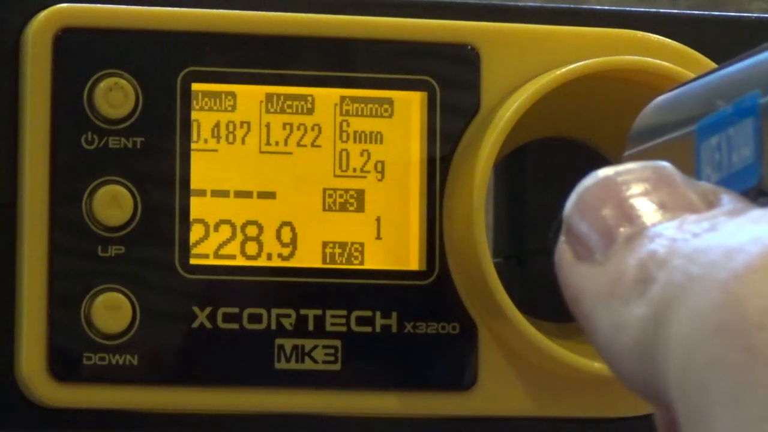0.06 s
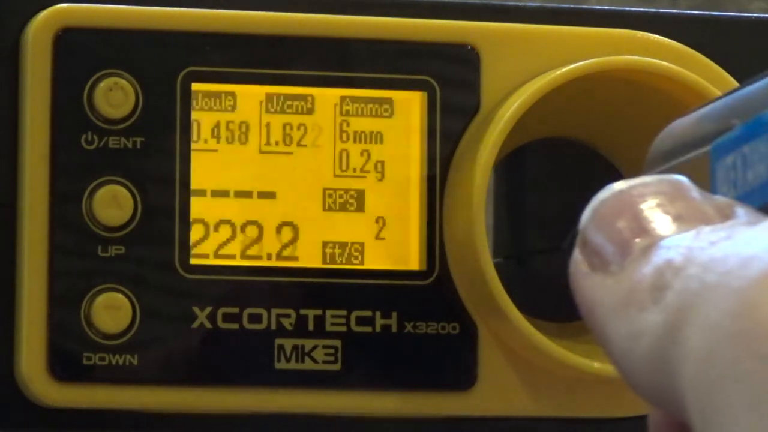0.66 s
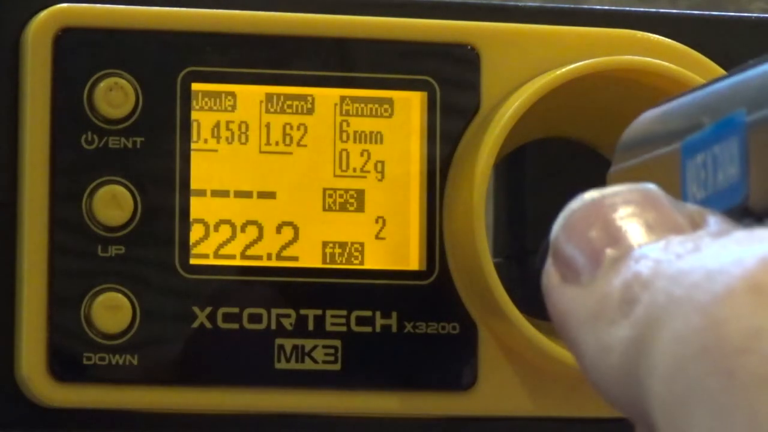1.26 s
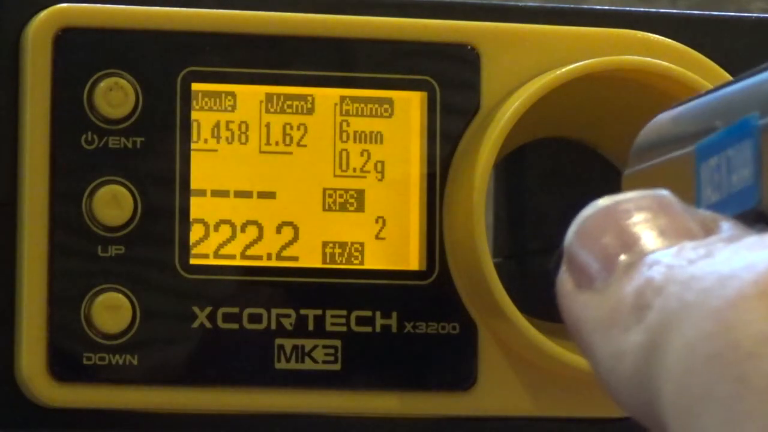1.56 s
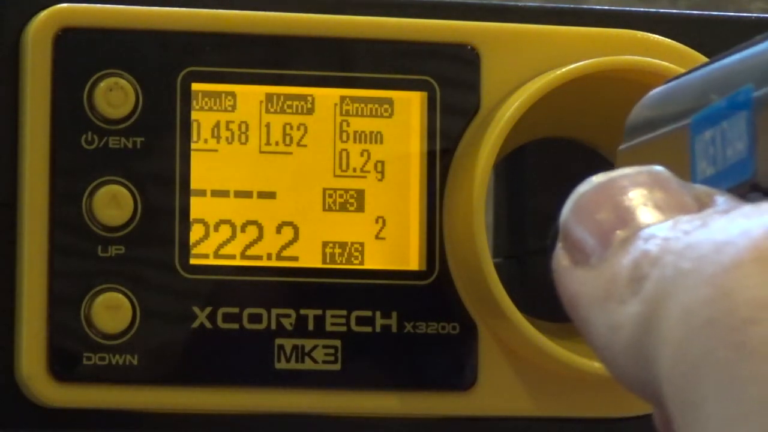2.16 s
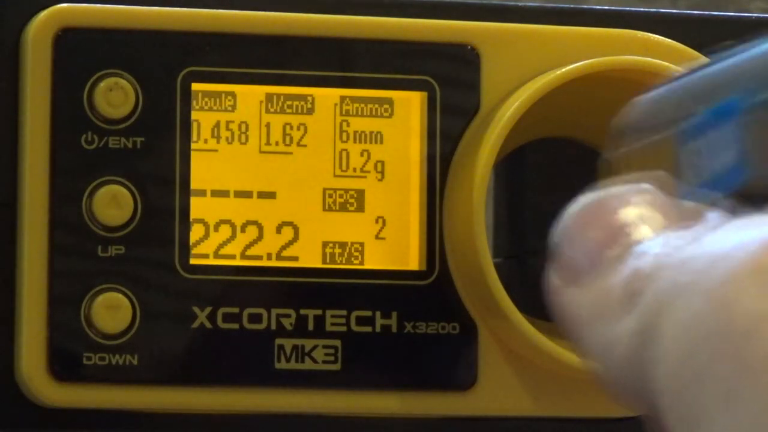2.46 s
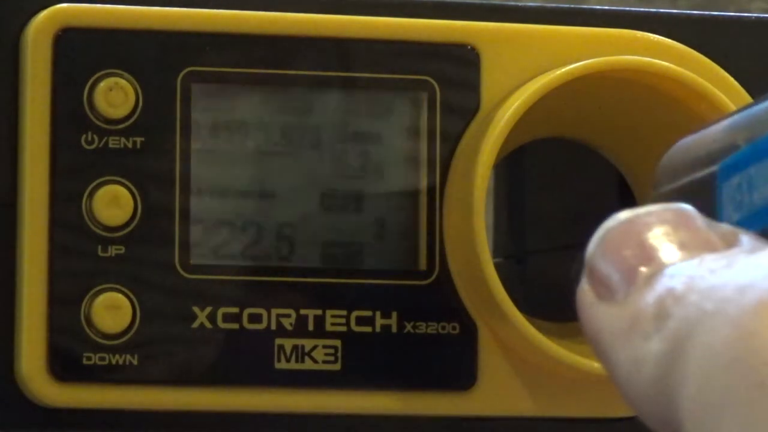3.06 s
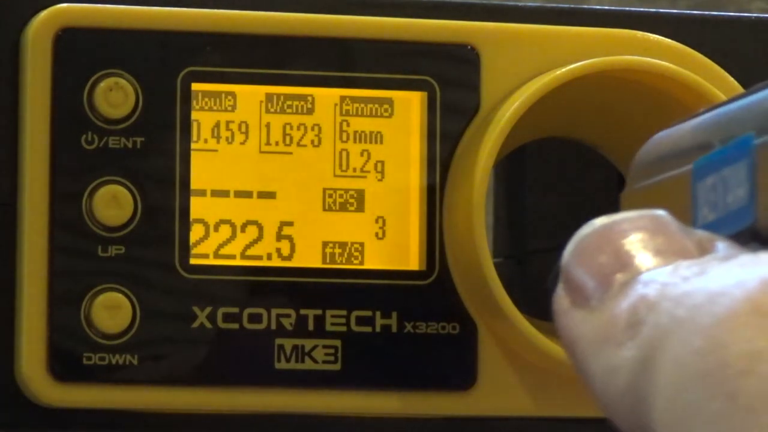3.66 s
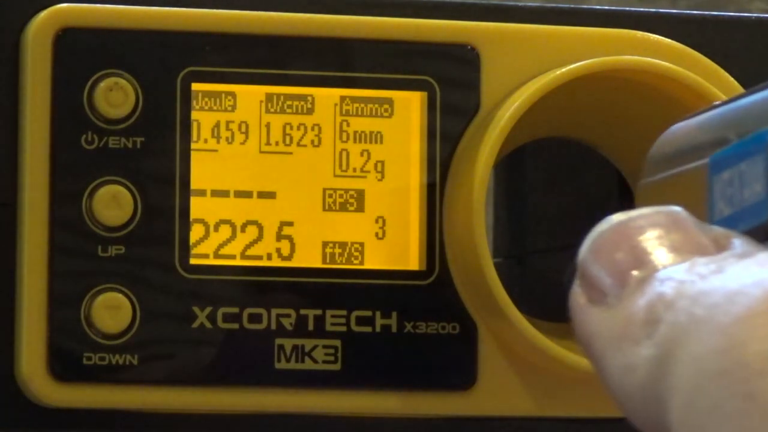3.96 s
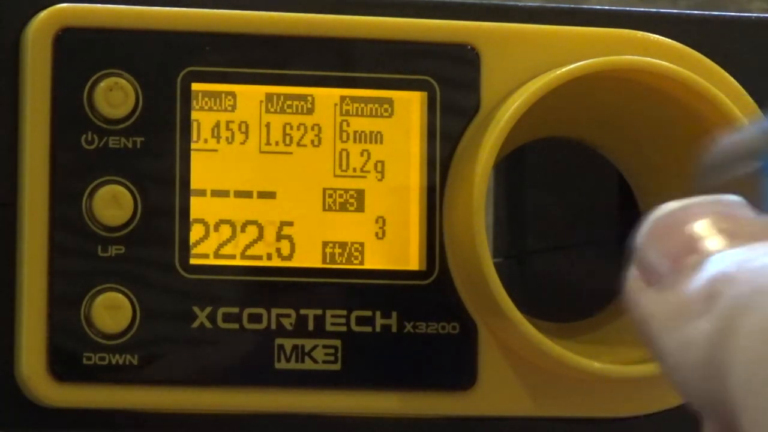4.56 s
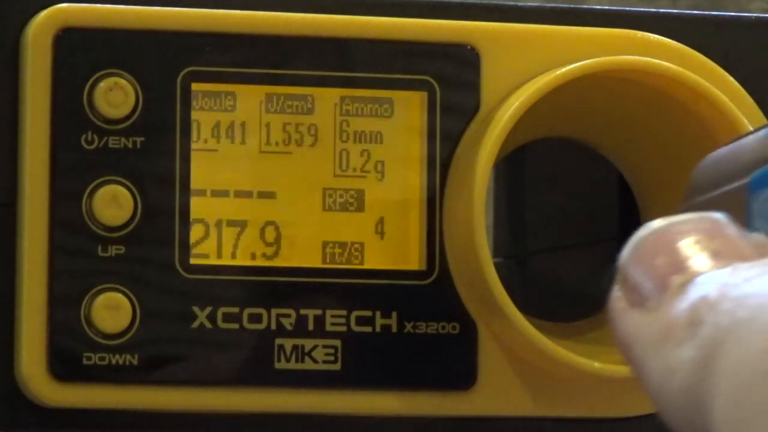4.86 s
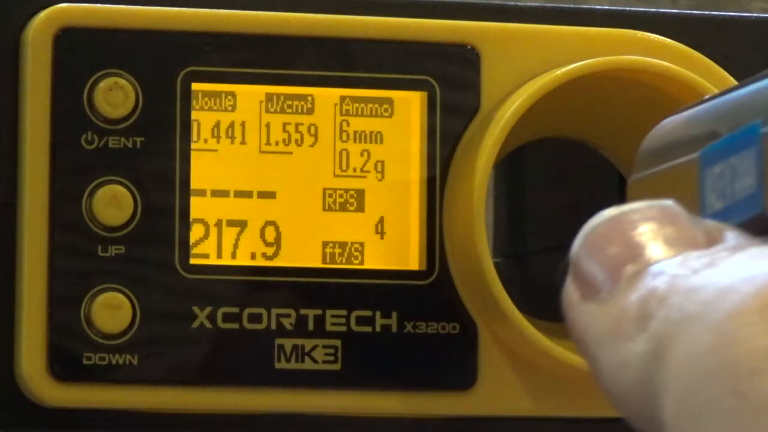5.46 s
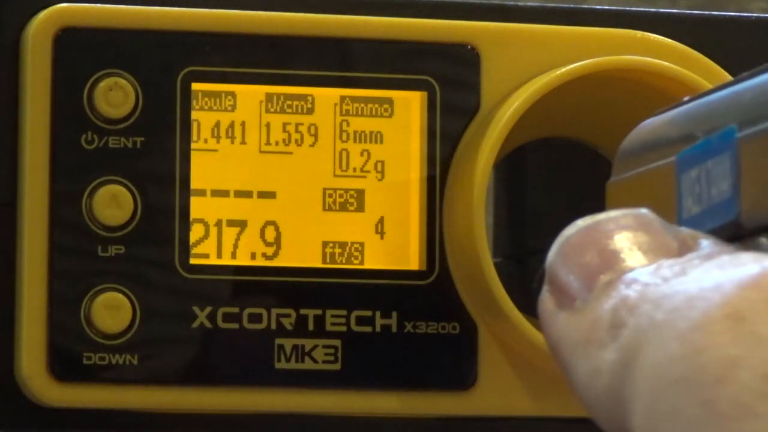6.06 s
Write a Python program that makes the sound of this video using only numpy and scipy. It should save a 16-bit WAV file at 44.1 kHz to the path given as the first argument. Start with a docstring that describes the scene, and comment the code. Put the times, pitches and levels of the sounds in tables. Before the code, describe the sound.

Close and centred in a small, quiet room, four sharp, evenly spaced pops come from a gas airsoft pistol shooting through a short measuring tube. Each pop has a bright hiss and rings briefly off the hard walls. A quick metallic snap and then a tiny trigger click follow each shot except the last. Only faint room air is heard between them.

```python
"""Four sharp pops from a gas airsoft pistol, fired through a chronograph in a small, hard-walled room.
The gun is close and central to a tight microphone pair. Each shot is a spit of gas and a muzzle pop
that rings the chronograph's tube and fills the room; the camera's limiter holds it flat.
A fifth of a second after each of the first three shots the action snaps back.
The trigger resets with a small hollow click, over faint room air."""
import sys
import numpy as np
from scipy import signal
from scipy.fft import rfft, irfft
from scipy.io import wavfile
from scipy.ndimage import uniform_filter1d

SR = 44100
rng = np.random.default_rng(int(sys.argv[2]) if len(sys.argv) > 2 else 0)


def dump_mix(stems):
    """Bounce the given channels to the path in sys.argv[1] as a 16-bit WAV at rate SR."""
    frames = np.atleast_2d(stems).T  # one column per channel
    limited = np.clip(frames, -1, 1)  # hard clip at full scale
    pcm = np.round(limited * 32767).astype(np.int16)
    wavfile.write(sys.argv[1], SR, pcm)


N = 278712
TIME = np.arange(SR) / SR  # one second, the life of a single sound


def shots():
    """Released gas spits and thumps at the gun, and the muzzle throws a pop into the room."""
    # Each row: time in seconds, level in dB, jet rasp in Hz, then rasp, hiss, thump and boom in dB.
    firings = [(0.3356, 3, 3023, 0.5, 3.5, -7, 2.5), (2.4528, 5, 3590, -6, -0.5, -5.5, 0),
               (4.4052, 3.5, 3420, 4, 1.5, -5.5, 1), (6.1837, 3, 3460, 4, 3, -1.5, 3)]
    # Spectra of the escaping gas and the muzzle pop. Each row: frequency in Hz, level in dB.
    gas_spectrum = [(1500, -10.5), (4000, -5.5), (7000, -8), (10400, 5.5), (13000, -3), (16000, -2)]
    pop_spectrum = [(100, -13.5), (300, -2), (620, 1), (900, 1), (1170, 5.5), (1600, 4), (2050, -4),
                    (2750, -1), (4300, -4), (4850, -8.5), (6500, -9.5), (8300, -5.5), (11200, 1),
                    (16000, -10)]
    near, thrown, hz = np.zeros(N), np.zeros(N), bins(TIME)
    lead_s = .01
    for s, db, rasp_hz, rasp_db, hiss_db, thump_db, boom_db in firings:
        # the valve opens just before the pellet leaves
        spit = burst(gas_spectrum, lead_s - .0007, rise_s=.00057, fall_s=.0012)
        hiss = burst(gas_spectrum, lead_s, rise_s=.00046, fall_s=.006)
        add(near, s - lead_s, undb(db + hiss_db) * (undb(26.5) * spit + undb(8) * hiss))
        # a quick overpressure, then a longer, shallow suction
        thump = np.exp(-TIME / .00028) - .085 * np.exp(-TIME / .0035)
        add(near, s, undb(db + thump_db + 17) * thump)
        # the jet breaks up differently in the tube each time
        jet_db = lift([(rasp_hz, 1297, rasp_db), (11000, 5000, hiss_db), (200, 500, boom_db)], hz)
        pop = colour(signal.unit_impulse(SR), curve(pop_spectrum, hz) + tube_db(hz) + jet_db)
        add(thrown, s, undb(db + 28.5) * pop)
        add(thrown, s - lead_s, undb(db + hiss_db + 12) * hiss)
    return near, thrown


def tube_db(hz, pitch_hz=1357, width_hz=200):
    """The chronograph's open tube resonates at multiples of its pitch."""
    # Lift in dB of each of the first four multiples.
    harmonic_lifts = [1.5, 2, 1.7, 7.5]
    return lift([(k * pitch_hz, width_hz, db) for k, db in enumerate(harmonic_lifts, 1)], hz)


def action():
    """Steel parts scrape for an instant and snap home."""
    # The action snaps back after a shot; the sear slips before one. Each row: time in seconds, level in dB.
    snaps = [(0.5340, -1), (2.6418, 1), (4.6199, -0.5)]
    sear_slips = [(0.3097, -43), (6.1573, -48)]
    # Steel on steel. Each row: frequency in Hz, level in dB.
    steel_spectrum = [(1500, -12.5), (3500, -7), (5000, -6), (8500, -6.5), (10300, 5.5), (13000, 1),
                      (16000, -12.5)]
    out = np.zeros(N)
    lead_s = .005
    for s, db in snaps + sear_slips:
        add(out, s - lead_s, undb(db) * burst(steel_spectrum, lead_s, rise_s=.00044, fall_s=.0013))
    return out


def trigger():
    """The trigger resets with a tick that rings the hollow grip."""
    # Trigger clicks. Each row: start in seconds, level in dB.
    clicks = [(0.0190, -45.5), (0.9270, -37), (3.2722, -36), (5.3174, -37.5)]
    # The grip's modes. Each row: frequency in Hz, level in dB, seconds to fall 60 dB.
    grip_modes = [(1267, 1.5, 0.011), (1570, -7.5, 0.0062), (3694, -14.5, 0.0155), (4900, -17, 0.012),
                  (6250, -16, 0.0039), (10300, -36, 0.0037)]
    # The bare tick. Each row: frequency in Hz, level in dB.
    tick_spectrum = [(900, -19), (1600, 6.5), (2700, -3), (4500, 9), (6800, -5), (8300, -24), (9800, 3),
                     (15000, -10)]
    out = np.zeros(N)
    ring = no_bass(sum(undb(db) * ringing(hz, t60) for hz, db, t60 in grip_modes))
    for s, db in clicks:
        tick = undb(5) * burst(tick_spectrum, 0, rise_s=.001, fall_s=.0012)
        add(out, s, undb(db) * (ring + tick))
    return out


def echoes(x):
    """Nearby hard surfaces return the bright part of a sound."""
    # The table top and the nearest wall. Each row: delay in seconds, level in dB.
    surfaces = [(.0052, -8.5), (0.013, -16)]
    bright = x - uniform_filter1d(x, size=15)
    samples = np.arange(N)
    return sum(undb(db) * np.interp(samples - delay_s * SR, samples, bright) for delay_s, db in surfaces)


def reverberation(lowest_hz=132, build_s=.0035, mode_width_hz=30):
    """Hard walls give dense reflections, coloured by the room's modes, with no deep bass."""
    # The strongest modes. Each row: frequency in Hz, lift in dB.
    modes = [(155, 3.5), (531, 4.5), (698, 6), (800, 5), (872, 1.5), (1049, 7.5), (1228, 5.5), (1387, -2),
             (1668, 4), (2286, 7.5), (2607, 5.5), (2720, 5.5), (3182, 5.5), (3983, 3.5)]
    # The room's decay. Each row: frequency in Hz, seconds to fall 60 dB.
    decay_times = [(150, 0.32), (380, 0.27), (1000, 0.34), (4000, 0.37), (8000, 0.33), (14000, 0.22)]
    # One weak low mode outlasts the rest: frequency in Hz, level in dB, seconds to fall 60 dB.
    slow_mode = (372, -57, 1.4)
    hz, noise = bins(TIME), rng.standard_normal(SR)
    # away from its resonances the room answers all pitches about equally
    noise_power = np.abs(rfft(noise * np.exp(-TIME / .14))) ** 2
    even = rfft(noise) / np.sqrt(uniform_filter1d(noise_power, size=41))
    diffuse = even * undb(lift([(f, mode_width_hz, db) for f, db in modes], hz))
    centres, t60s = np.transpose(decay_times)
    bands = [irfft(diffuse * curve(np.c_[centres, share], hz)) for share in np.eye(len(t60s))]
    tail = sum(band * undb(-60 * TIME / t60) for band, t60 in zip(bands, t60s))
    build_up = 1 - np.exp(-TIME / build_s)
    slow_hz, slow_db, slow_t60 = slow_mode
    response = unit(tail * build_up) + undb(slow_db) * unit(ringing(slow_hz, slow_t60))
    return signal.sosfilt(signal.butter(12, lowest_hz, "high", fs=SR, output="sos"), response)


def room(x):
    """The reverberation reaches two closely spaced microphones, a little different at each."""
    # Stereo width: side minus mid in dB, where it opens in Hz, where it narrows in Hz.
    width = (-8, 640, 8900)
    mid = signal.fftconvolve(x, reverberation())[:N]
    side_response = colour(reverberation(), side_db(bins(TIME), *width, order=6))
    side = signal.fftconvolve(x, side_response)[:N]
    return np.array([mid + side, mid - side])


def room_tone(level_db=-65):
    """Steady room air with a few faint resonances, and microphone hiss."""
    # Air and hiss. Each row: frequency in Hz, relative level in dB.
    air_spectrum = [(20, -10), (50, -3), (110, -0.5), (200, 0.5), (300, 0), (600, -2.5), (800, -4.5),
                    (1400, -5.5), (1800, -7.5), (3000, -9.5), (6000, -12), (15500, -16)]
    # Faint resonances. Each row: frequency in Hz, width in Hz, lift in dB.
    resonances = [(890, 94, 4), (1020, 70, 3), (1160, 94, 3), (2082, 64, 7), (4080, 149.4, 1.5)]
    # Stereo width: side minus mid in dB, where it opens in Hz, where it narrows in Hz.
    width = (-0.5, 420, 4500)
    mid, side = rng.standard_normal((2, N))
    hz = bins(mid)
    air_db = curve(air_spectrum, hz) + lift(resonances, hz)
    mid = colour(mid, air_db)
    side = colour(side, air_db + side_db(hz, *width, order=3))
    return np.array([mid + side, mid - side]) * undb(level_db) / np.std(mid)


def side_db(hz, width_db, open_hz, narrow_hz, order):
    """Stereo width by pitch: central in the bass, wide in the middle, narrow at the top."""
    apart = (hz + 1) / np.hypot(hz, open_hz)
    return width_db + 20 * np.log10(apart / np.hypot(1, (hz / narrow_hz) ** order))


def burst(spectrum, peak_s, rise_s, fall_s):
    """A short coloured noise that swells to a peak and dies, unit energy."""
    envelope = np.exp(np.minimum((TIME - peak_s) / rise_s, (peak_s - TIME) / fall_s))
    noise = envelope * rng.standard_normal(SR)
    return unit(no_bass(colour(noise, curve(spectrum, bins(TIME)))))


def ringing(hz, t60):
    """One struck mode, falling 60 dB in t60 seconds."""
    return np.sin(2 * np.pi * hz * TIME) * undb(-60 * TIME / t60)


def no_bass(x):
    """Small bodies radiate little under a kilohertz."""
    return signal.sosfilt(signal.butter(3, 950, "high", fs=SR, output="sos"), x)


def colour(x, db):
    """Causal filter with the given gain in each frequency bin."""
    cepstrum = irfft(np.log(undb(db)), len(x))
    cepstrum[1:len(x) // 2] *= 2
    cepstrum[len(x) // 2 + 1:] = 0
    return irfft(rfft(x) * np.exp(rfft(cepstrum)), len(x))


def lift(peaks, hz):
    """Gain in dB of a set of (centre Hz, width Hz, dB) resonances."""
    return sum(db / (1 + (2 * (hz - centre) / width) ** 2) for centre, width, db in peaks)


def curve(points, hz):
    """Read (Hz, value) points on a log-frequency axis."""
    f, value = np.transpose(points)
    return np.interp(np.log(hz + 1), np.log(f), value)


def bins(x):
    """Frequencies of the spectrum of x."""
    return np.fft.rfftfreq(len(x), 1 / SR)


def undb(db):
    """Decibels to gain."""
    return 10 ** (np.asarray(db) / 20)


def unit(x):
    """Scale to unit energy."""
    return x / np.sqrt(np.sum(x ** 2))


def add(track, s, sound):
    """Mix a sound into a track at time s."""
    start = int(s * SR)
    track[start:start + len(sound)] += sound[:N - start]


def scene():
    """The gun is close and central; its shots, snaps and clicks also sound the room."""
    near, thrown = shots()
    snaps, clicks = action(), trigger()
    direct = near + snaps + clicks
    reverb = room(thrown + undb(-11.5) * snaps + undb(-12) * clicks)
    return direct + echoes(direct) + reverb + room_tone()


def limiter(x, ceiling_db=-19.5, release_s=.0092, ahead_s=.0019):
    """A fast look-ahead limiter holds loud sounds near its ceiling."""
    memory = np.exp(-1 / (release_s * SR))
    power = signal.lfilter([1 - memory], [1, -memory], np.mean(x ** 2, axis=0))
    coming_power = np.interp(np.arange(N) + ahead_s * SR, np.arange(N), power)
    return x / np.sqrt(1 + coming_power / undb(ceiling_db) ** 2)


def record(dry):
    """The camera limits the shots, rounds off the peaks that slip through and cuts the top."""
    peak, top_hz = .3, 15650
    held = limiter(dry)
    rounded = held / (1 + (held / peak) ** 4) ** .25
    return signal.sosfilt(signal.ellip(8, .2, 70, top_hz, fs=SR, output="sos"), rounded)


dry = scene()
out = record(dry)
dump_mix(out)
```